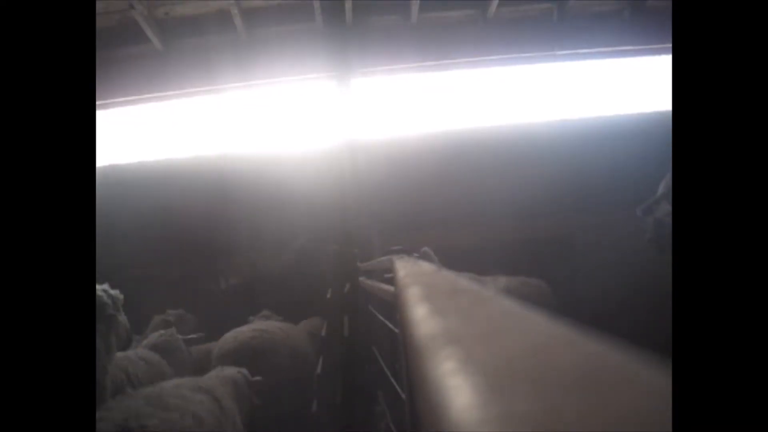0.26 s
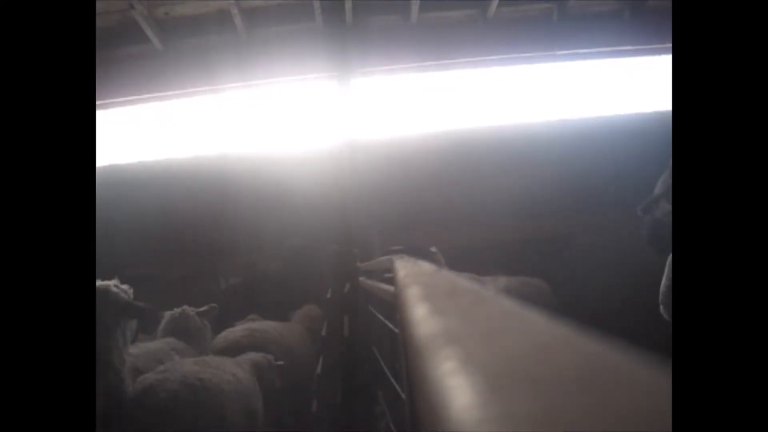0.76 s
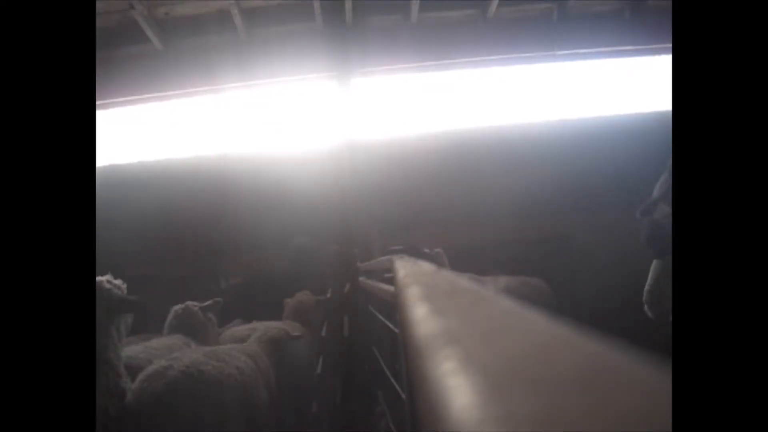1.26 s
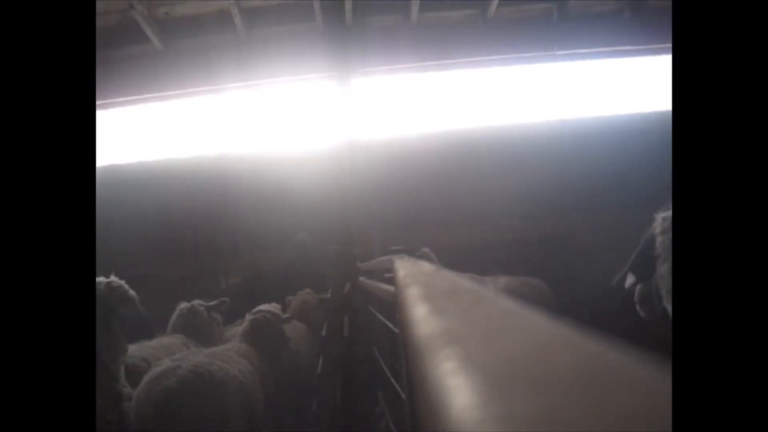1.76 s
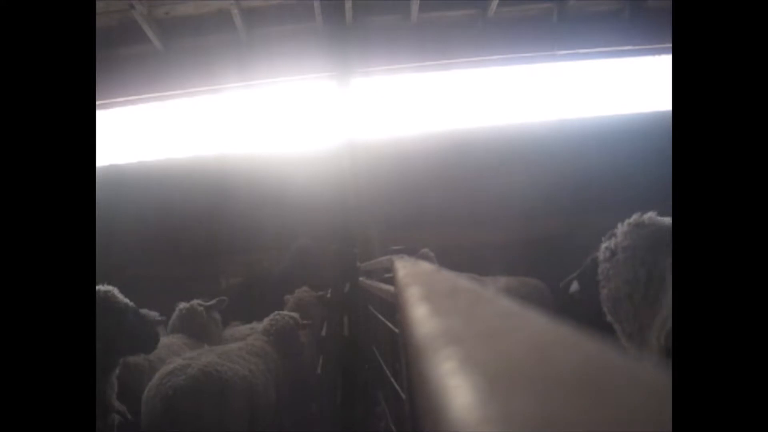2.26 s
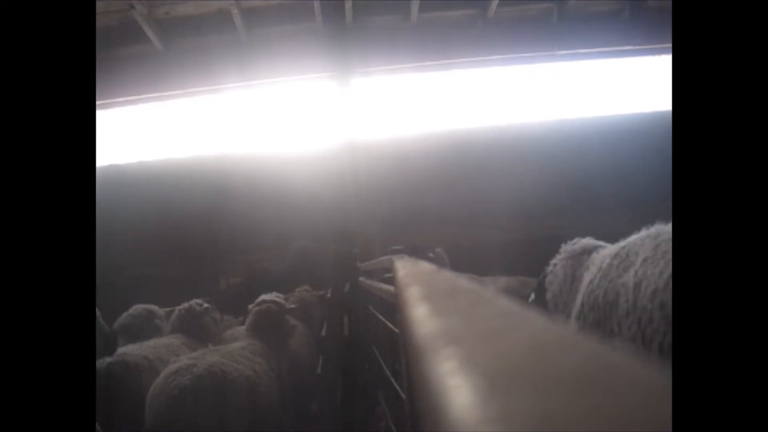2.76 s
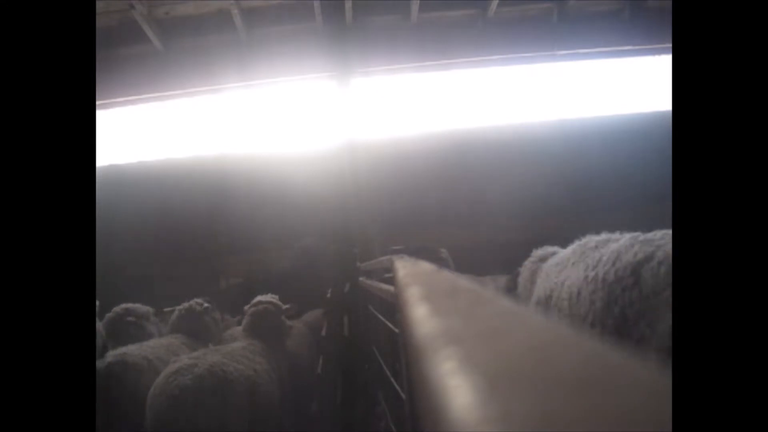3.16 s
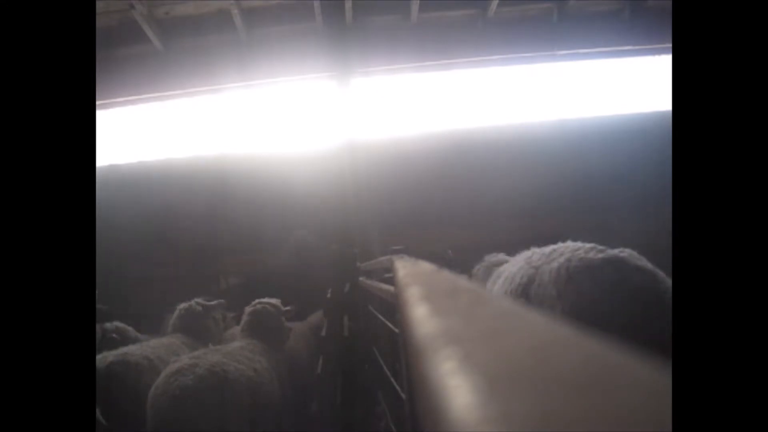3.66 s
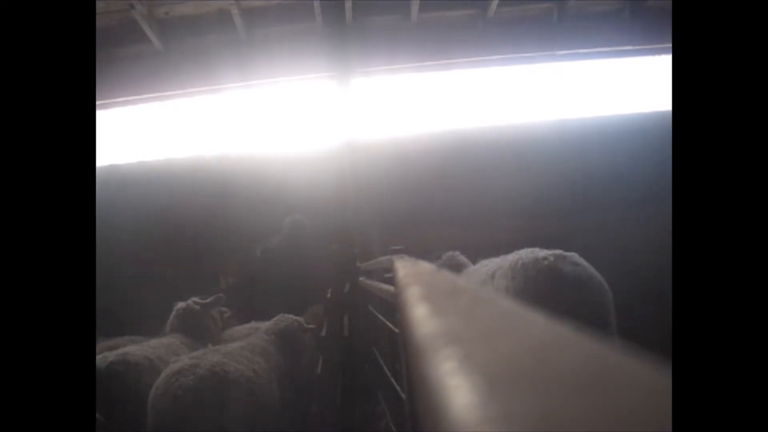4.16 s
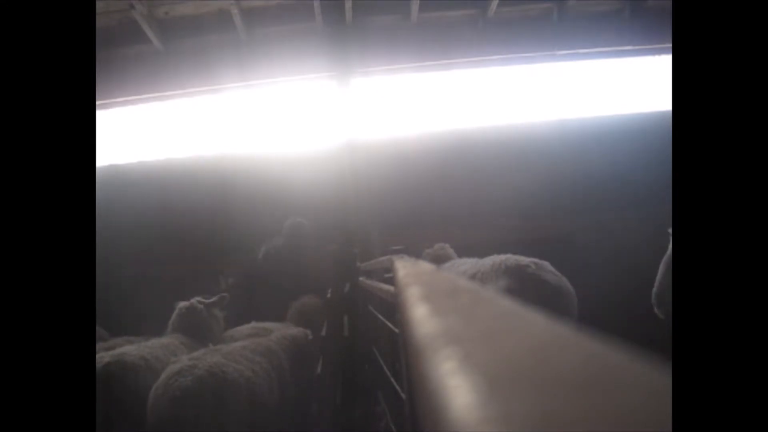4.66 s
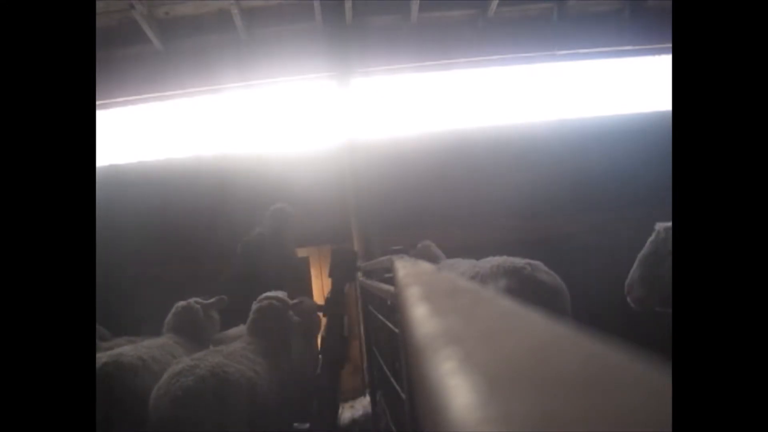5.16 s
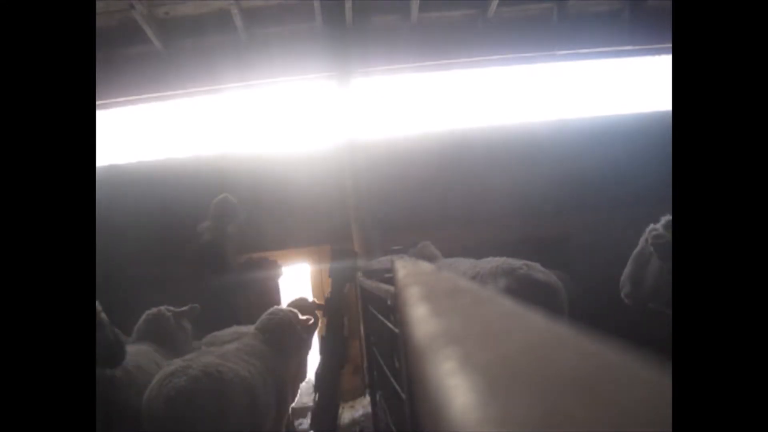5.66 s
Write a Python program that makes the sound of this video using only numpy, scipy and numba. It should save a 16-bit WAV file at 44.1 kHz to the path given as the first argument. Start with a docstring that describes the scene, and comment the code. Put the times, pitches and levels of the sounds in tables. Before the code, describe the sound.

A raspy bleat, then two sheep quavering together, among wooden bumps, rustling straw and chirping birds, before a door bolt rings.

```python
"""A sheep pen inside a barn, on one microphone. A lone ewe gives a bright, raspy bleat, then two bleat
together, duller and quavering: vocal fold pulses ring in throat and mouth. Straw rustles underfoot, thin
tones squeak and small birds chirp up in the rafters. The flock bumps and scuffs against wooden hurdles,
which creak; straw and fittings tick. Last, a steel bolt is shot back and rings as a door is opened."""
import sys
import numpy as np
from scipy import signal
from scipy.fft import rfft, irfft
from scipy.io import wavfile
from scipy.ndimage import uniform_filter1d, map_coordinates
from numba import njit

SR = 44100
rng = np.random.default_rng(int(sys.argv[2]) if len(sys.argv) > 2 else 0)


def wav_record(signal):
    """Record a signal, one row per channel, as 16-bit PCM in the file named by sys.argv[1]."""
    frames = np.transpose(np.atleast_2d(signal))
    bounded = np.clip(frames, -1, 1)
    # unit amplitude maps onto the largest positive 16-bit level
    quanta = np.round(bounded * 32767).astype(np.int16)
    wavfile.write(sys.argv[1], SR, quanta)


N = 260631
TIME = np.arange(N) / SR


def from_db(db):
    """Decibels to gain."""
    return 10 ** (np.asarray(db) / 20)


def unit_rms(x):
    """Scale to an rms of 1."""
    return x / np.sqrt(np.mean(x ** 2) + 1e-20)


def even(x):
    """Hold the running rms at 1."""
    return x / np.sqrt(np.abs(uniform_filter1d(x ** 2, size=2200)) + 1e-6 * np.mean(x ** 2))


def in_time(rows):
    """Each column of a (time, values...) table, interpolated to every sample."""
    times, *columns = np.transpose(rows)
    return [np.interp(TIME, times, column) for column in columns]


def band(x, hz, kind):
    """Butterworth filter, fourth order at each edge."""
    return signal.sosfilt(signal.butter(4, hz, kind, fs=SR, output="sos"), x + 1e-18)


def drift(rate_hz):
    """Smooth random wander with an rms of 1."""
    knots = rng.standard_normal(4096)
    return unit_rms(map_coordinates(knots, [TIME * rate_hz * 2], order=3, mode="wrap"))


def colour(x, spectrum, size=4096):
    """Causal (minimum-phase) filter with the outline (frequency [Hz], level [dB])."""
    hz, db = np.transpose(spectrum)
    outline = np.interp(np.log(np.fft.rfftfreq(size, 1 / SR) + 1), np.log(hz), db)
    cepstrum = irfft(np.log(from_db(outline)))
    cepstrum[1:size // 2] *= 2
    cepstrum[size // 2 + 1:] = 0
    return signal.fftconvolve(x, irfft(np.exp(rfft(cepstrum, size))))[:N]


def barn(x, wet_db, t60_s=.39, treble_t60_s=.3):
    """What reaches the microphone: direct sound plus dense reflections whose treble dies first."""
    t = TIME[:SR]
    echoes = rng.standard_normal(SR) * (t > .004)
    tail = band(echoes, 1970, "low") * from_db(-60 * t / t60_s)
    tail += band(echoes, 2510, "high") * from_db(-60 * t / treble_t60_s)
    reflections = signal.fftconvolve(x, tail / np.linalg.norm(tail))[:N]
    wet = from_db(wet_db)
    return (x + wet * reflections) / np.hypot(1, wet)


def grains(per_s, spread_db):
    """Random tiny contacts of uneven size."""
    sizes = from_db(spread_db * np.minimum(rng.exponential(1, N), 4)) * rng.choice([-1, 1], N)
    return unit_rms(sizes * (rng.random(N) < per_s / SR))


def pulse_train(pitch_hz, rough, jitter, rasp):
    """One pulse per cycle; roughness shakes timing and strength and adds noise in each cycle."""
    cycles = np.cumsum(pitch_hz * (1 + jitter * rough * (drift(70) + .5 * drift(16)))) / SR
    pulses = np.diff(np.floor(cycles), prepend=-1) * from_db(6.6 * rough * drift(80))
    turbulence = rng.standard_normal(N) * np.exp(-4 * (cycles % 1))
    return unit_rms(pulses) + rasp * rough * unit_rms(turbulence)


def glides(rows, waver, waver_hz, octave_db):
    """Short gliding tones of wavering pitch, each with its octave."""
    out = np.zeros(N)
    wobble = 1 + waver * drift(waver_hz)
    for start, length, start_hz, end_hz, level_db in rows:
        span = slice(int(start * SR), int((start + length) * SR))
        progress = np.linspace(0, 1, span.stop - span.start)
        hz = (start_hz + (end_hz - start_hz) * progress) * wobble[span]
        phase = 2 * np.pi * np.cumsum(hz) / SR
        envelope = np.sqrt(2) * from_db(level_db) * np.sin(np.pi * progress)
        out[span] += envelope * (np.sin(phase) + from_db(octave_db) * np.sin(2 * phase))
    return out


@njit
def moving_resonance(x, centre_hz, width_hz):
    """Two-pole resonator of peak gain 1 whose centre moves."""
    angle = 2 * np.pi * centre_hz / SR
    r = np.exp(-np.pi * width_hz / SR)
    y = np.zeros(len(x))
    for i in range(2, len(x)):
        drive = (1 - r * r) / 2 * (x[i] - x[i - 2])
        y[i] = drive + 2 * r * np.cos(angle[i]) * y[i - 1] - r * r * y[i - 2]
    return y


def bleat(folds, call, throat, mouth, wet_db, jaw_width_hz, tongue_width_hz=190):
    """Fold pulses ring in the throat; jaw and tongue each lift a moving resonance; the call shudders."""
    start, end, level_db, rasp_db, shudder_depth_db = call
    jaw_hz, jaw_db, tongue_hz, tongue_db = in_time(mouth)
    attack_s, accent_s, rasp_rise_s, release_s = .025, .06, .07, .05
    shudder_db = shudder_depth_db * drift(18)
    # the call opens with an accent; the rasp grows towards its end
    level_db = level_db + 2.5 * np.exp(-np.maximum(TIME - start, 0) / accent_s)
    rasp_db = rasp_db + 10 * np.exp(np.minimum(TIME - end, 0) / rasp_rise_s) + 1.7 * shudder_db
    gate = np.clip((TIME - start) / attack_s + .5, 0, 1) * np.clip((end - TIME) / release_s, 0, 1)
    voice = barn(band(colour(folds, throat), 128, "high"), wet_db)
    jaw = from_db(jaw_db) * even(moving_resonance(voice, jaw_hz, jaw_width_hz))
    tongue = from_db(tongue_db) * even(moving_resonance(voice, tongue_hz, tongue_width_hz))
    body = even(band(voice, 2750, "low"))
    vowel = even(from_db(shudder_db) * (body + tongue) + jaw)
    rasp = from_db(rasp_db) * even(band(voice, 3760, "high"))
    return barn(gate * from_db(level_db) * (vowel + rasp), wet_db=-8.5)


def lone_ewe():
    """One ewe's bright, raspy bleat, which grows hoarser as her pitch sinks."""
    # her bleat (start [s], end [s], level [dB], rasp [dB], shudder depth [dB])
    call = (-0.03, 0.527, -15.6, -13.5, .7)
    # vocal folds (time [s], pitch [Hz])
    pitch = [(0, 139.1), (.06, 142.7), (.12, 143.4), (.16, 138.8), (.24, 138.6), (.38, 133.6), (.43, 127.7),
             (.52, 121)]
    # hoarseness over her range (pitch [Hz], roughness [0-1])
    hoarseness = [(121, .2), (138, .12), (141, .05)]
    # throat resonances (frequency [Hz], level [dB])
    throat = [(140, -15), (280, -21), (420, -9.5), (560, -7), (675, -1.5), (830, -17), (1120, -6.5),
              (1400, -7), (1720, -13), (2150, 0), (2700, -9), (3000, -14), (3650, -19), (4150, -15),
              (4500, -17), (4950, -13), (5350, -35), (7000, -35), (8700, -44), (10300, -42), (13000, -72)]
    # mouth resonances (time [s], jaw [Hz], jaw lift [dB], tongue [Hz], tongue lift [dB])
    mouth = [(0, 570, -6, 2080, -2), (.09, 575, -4, 2120, -3), (.125, 690, -4, 2130, -4),
             (.21, 690, -8, 2230, -6), (.29, 675, 0, 2230, -4), (.36, 668, 3, 2400, -7),
             (.42, 645, 3, 2600, -8), (.5, 615, 2, 2690, -6)]
    pitch_hz = in_time(pitch)[0]
    rough = np.interp(pitch_hz, *np.transpose(hoarseness))
    folds = pulse_train(pitch_hz, rough, jitter=.03, rasp=.6)
    return bleat(folds, call, throat, mouth, wet_db=3.5, jaw_width_hz=40)


def straw():
    """Trodden straw: fine crackle that swells and sinks over the barn's hush."""
    # colour of straw and hush (frequency [Hz], level [dB])
    spectrum = [(15, -42), (25, -9.5), (148, 1), (331, -1), (389, 1), (582, -1), (648, -1), (895, -1.5),
                (1170, -3), (1270, -3), (1850, -6.5), (2630, -4.5), (6380, -11.5), (15500, -28)]
    # restless feet (time [s], level [dB])
    shuffle = [(0, -37), (.7, -41), (2.7, -45), (3.3, -35.5), (3.85, -41.5), (4.25, -37.5), (4.5, -42.5),
               (4.98, -37), (5.7, -43), (5.9, -38)]
    crackle = .6 * grains(4000, spread_db=2.5) * from_db(2.5 * drift(14))
    hush = rng.standard_normal(N)
    rustle = band(colour(hush + crackle, spectrum), 15000, "low")
    return from_db(in_time(shuffle)[0]) * unit_rms(rustle)


def thin_tones():
    """Short thin tones with their octave: a whistle in the bleat, squeaks, a chirp's low undertone."""
    # tones (time [s], length [s], start pitch [Hz], end pitch [Hz], level [dB])
    tones = [(0.458, 0.047, 2860, 2650, -23), (.592, 0.019, 790, 800, -25), (1.284, 0.018, 605, 552, -19.5),
             (3.194, 0.046, 950, 1064, -24), (3.227, 0.092, 1038, 1112, -24.5),
             (3.438, 0.035, 1760, 1710, -35)]
    return from_db(3) * barn(glides(tones, waver=.01, waver_hz=93, octave_db=-9), wet_db=-3)


def woodwork(rise_s=.016):
    """Each bump is a swelling, then dying burst of contacts in the boards; the thud outlasts the top."""
    # knocks on the boards (time [s], level [dB], crack [dB], t60 [s])
    knocks = [(.538, -10, -9, .14), (.969, -4, -27, .075), (1.056, -14, -11, .2), (1.095, -3.5, -8.5, .16),
              (1.319, -11, -6, .24), (1.826, -20, -4, .2), (1.838, -13, -4, .26), (1.872, -9.5, -2, .3),
              (2.105, -10, -5, .28), (3.177, -3.5, -10, .18), (3.295, -3.5, -25, .15),
              (3.637, -12, -25, .075)]
    # a body shoves the hurdle and the floor thuds (time [s], level [dB], thud [dB], crack [dB])
    shoves = [(3.271, -4, -5, -9), (3.352, -13.5, -2, -9), (4.607, -11, -6, -1), (4.635, -8.5, -17, -1)]
    # hooves and the door scuff over the floor (time [s], level [dB], crack [dB])
    scuffs = [(1.949, -21, -5), (1.995, -22, -4), (2.042, -18.5, -5), (3.15, -25, 4), (3.225, -23, 5),
              (4.322, -26, 4), (4.861, -26, -1), (4.921, -22, -.5), (4.965, -27, -1), (5.09, -26.5, 2),
              (5.214, -29, 10), (5.254, -24.5, 8), (5.296, -19, -4), (5.762, -20, -6), (5.834, -24, -6)]
    # colour of the boards (frequency [Hz], level [dB])
    spectrum = [(24, -40), (40, -30), (103, -42), (233, -5.5), (502, -0.5), (627, 2.5), (1290, -10),
                (1420, -8.5), (1690, -14), (2110, -7), (3300, -9.5), (3560, -10.5), (6300, -32.5),
                (9360, -33.5), (15000, -49)]
    bumps = [(s, db, -32, crack, crack - 22, t60) for s, db, crack, t60 in knocks]
    bumps += [(s, db, thud, crack, crack - 11, .17) for s, db, thud, crack in shoves]
    bumps += [(s, db, -21, crack, -10, .24) for s, db, crack in scuffs]
    times, level_db, thud_db, crack_db, splinter_db, t60_s = np.transpose(bumps)
    boards = colour(grains(7000, spread_db=3), spectrum)
    # thud, body, crack and splinters (band [Hz], level [dB], stretch of rise and decay [ratio])
    parts = [((45, 135), thud_db - 6.5, 2), ((165, 1450), -1.5, 1),
             ((1450, 6000), crack_db, 1), ((6000, 13000), splinter_db - 3, 1)]
    out = np.zeros(N)
    for edges_hz, part_db, stretch in parts:
        power = np.zeros(N)
        for at, gain, ring_s in zip((times * SR).astype(int), from_db(level_db + part_db), t60_s):
            t = TIME[:min(SR, N - at)] / stretch
            envelope = gain * np.minimum(t / rise_s, 1) * from_db(-60 * t / ring_s)
            power[at:at + len(t)] += envelope ** 2
        out += np.sqrt(power) * unit_rms(band(boards, edges_hz, "band"))
    return from_db(-2.3) * barn(out, wet_db=-4.5)


def birds(buzz_depth=.12, buzz_hz=450):
    """From the rafters, mostly through the room: bending whistles, some fluttered into a harsh buzz."""
    # notes (time [s], length [s], start [Hz], middle [Hz], end [Hz], level [dB], buzz [0-1])
    chirps = [(.712, .05, 3200, 4450, 2900, -25, .3), (.768, .052, 3000, 4050, 2600, -22, .4),
              (.795, .085, 5600, 5700, 4400, -33, .3), (1.02, .05, 4700, 4200, 3300, -35, .5),
              (1.232, .06, 4200, 3400, 2700, -30, .4), (1.285, .05, 4300, 4900, 4400, -35, .4),
              (1.42, .055, 4300, 3200, 2750, -28, .5), (1.615, .055, 4200, 3400, 2600, -32, .7),
              (1.665, .045, 4700, 4950, 4300, -27, .3), (1.67, .04, 3200, 3400, 2600, -29, .5),
              (1.738, .045, 2950, 3650, 4200, -22, .25), (2.035, .055, 5600, 4700, 3900, -26, .5),
              (2.09, .05, 4300, 4000, 3300, -30, .5), (2.39, .04, 4200, 4100, 3700, -36, .2),
              (2.45, .05, 3500, 3350, 2700, -31, .2), (2.8, .06, 4300, 4200, 3600, -38, .6),
              (3.15, .05, 4000, 5200, 3800, -31, 1), (3.197, .052, 4600, 4150, 3600, -22, .35),
              (3.25, .05, 4500, 3700, 3000, -24, .5), (3.425, .065, 4700, 3500, 2800, -28, .9),
              (3.5, .055, 4450, 4300, 2900, -31, .2), (3.575, .035, 2350, 2750, 3000, -31, .3),
              (3.635, .055, 4400, 4250, 2800, -29.5, .4), (3.705, .035, 2400, 2850, 3050, -31, .3),
              (3.985, .06, 4300, 3000, 2400, -35, 1), (4.02, .055, 3300, 4300, 3000, -25, 1),
              (4.072, .06, 4000, 3350, 2750, -24, .5), (4.272, .055, 4400, 3600, 2600, -35, .8),
              (5.152, .028, 5200, 4600, 3700, -21.5, .2)]
    out = np.zeros(N)
    flutter = buzz_depth * drift(buzz_hz)
    for start, length, start_hz, middle_hz, end_hz, level_db, buzz in chirps:
        span = slice(int(start * SR), int((start + length) * SR))
        progress = np.linspace(0, 1, span.stop - span.start)
        hz = np.polyval(np.polyfit([0, .5, 1], [start_hz, middle_hz, end_hz], 2), progress)
        phase = 2 * np.pi * np.cumsum(hz * (1 + buzz * flutter[span])) / SR
        envelope = from_db(level_db) * np.abs(np.sin(np.pi * progress)) ** .55
        out[span] += envelope * (np.sin(phase) + from_db(-29.5) * np.sin(2 * phase))
    return from_db(7.7) * barn(band(out, 1800, "high"), wet_db=2.5)


def creak(attack_s=.02, decay_s=.015):
    """Wood sticks and slips a few hundred times a second and sets the hurdle ringing."""
    # pushes on the hurdle (time [s], length [s], slip rate [Hz], level [dB])
    pushes = [(.957, .02, 228, -25), (1.037, .075, 243, -26), (1.308, .035, 232, -16),
              (1.345, .04, 242, -15.5), (1.4, .07, 243, -25)]
    # ring of the hurdle (frequency [Hz], level [dB])
    spectrum = [(150, -27), (245, 1), (480, 6.5), (700, 4), (960, 2), (1180, -7), (1450, 1), (1950, -16),
                (2200, -12), (2420, 1), (2700, -12), (3400, 2), (3850, 0), (4500, -10), (7000, -45),
                (14000, -62)]
    envelopes = []
    for start, length, _, db in pushes:
        rise = np.clip((TIME - start) / attack_s, 0, 1)
        fall = np.exp(-np.maximum(TIME - start - length, 0) / decay_s)
        envelopes.append(from_db(db) * rise * fall)
    slip_hz = np.array(pushes)[np.argmax(envelopes, axis=0), 2]   # the strongest push sets the rate
    slips = pulse_train(slip_hz, rough=.2, jitter=.04, rasp=1.1)
    return barn(np.max(envelopes, axis=0) * unit_rms(colour(slips, spectrum)), wet_db=-4.5)


def ewe_pair():
    """A ewe hums, then opens into a duller, quavering bleat; a companion joins in."""
    # their bleat (start [s], end [s], level [dB], rasp [dB], shudder depth [dB])
    call = (2.152, 3.178, -15.2, -26.5, 1.5)
    # the leader's vocal folds, rising and falling in one arch (time [s], pitch [Hz])
    pitch = [(2.2, 161.5), (2.26, 170.2), (2.31, 198), (2.4, 209), (2.54, 207), (2.61, 217), (2.68, 222.2),
             (2.8, 218.3), (2.89, 200), (2.96, 199), (3.04, 174.5), (3.11, 164), (3.18, 160)]
    # hoarseness over her range (pitch [Hz], roughness [0-1])
    hoarseness = [(165, .36), (205, .52), (214, .48), (220, .16)]
    # the companion's voice (time [s], pitch [Hz], level against the leader [dB])
    companion_line = [(2.25, 173.4, -15), (2.32, 190, -2), (2.44, 192, -2), (2.55, 190, -10),
                      (2.76, 187, -9), (2.87, 189.5, 3), (3.0, 187, -6), (3.1, 181.6, -3)]
    # throat resonances of the pair (frequency [Hz], level [dB])
    throat = [(190, -10), (300, -12), (430, -3), (620, 3), (740, -1), (900, -4.5), (1150, -7), (1560, -2),
              (1850, -8), (2250, 1), (2700, -5), (3400, -19), (4700, -22), (5400, -13), (6100, -32),
              (8000, -32), (10000, -40), (13000, -64)]
    # mouth resonances (time [s], jaw [Hz], jaw lift [dB], tongue [Hz], tongue lift [dB])
    mouth = [(2.16, 650, -3, 2150, -7), (2.21, 665, -3, 2250, -4), (2.26, 685, 1, 1580, -10),
             (2.32, 760, -4, 1530, -7), (2.41, 750, -7, 1560, 0), (2.52, 665, -7, 1580, -6),
             (2.62, 670, -3, 1520, -7), (2.665, 880, -2, 1480, -10), (2.73, 745, -3, 1510, -16),
             (2.8, 690, -8, 1510, -12), (2.88, 755, -2, 1560, -9), (2.96, 785, 0, 1570, -8),
             (3.03, 705, 3, 1550, -4), (3.08, 720, 3, 1530, -6), (3.15, 665, 3, 1520, -10)]
    # her start, mouth shut (time [s], length [s], start pitch [Hz], end pitch [Hz], level [dB])
    hum_glide = [(2.098, 0.035, 148, 214, -23.5)]
    leader_hz = in_time(pitch)[0]
    companion_hz, companion_db = in_time(companion_line)
    rough = np.interp(leader_hz, *np.transpose(hoarseness))
    quaver = 1 + .055 * rough * np.sin(2 * np.pi * 13 * TIME + drift(3))
    leader = pulse_train(leader_hz * quaver, rough, jitter=.05, rasp=.55)
    companion = from_db(companion_db) * pulse_train(companion_hz, rough, jitter=.036, rasp=1.0)
    duet = bleat(leader + companion, call, throat, mouth, wet_db=1.5, jaw_width_hz=75)
    hum = glides(hum_glide, waver=.013, waver_hz=100, octave_db=-13)
    return duet + barn(hum, wet_db=-6)


def ticks(rise_s=.0015, decay_s=.0048):
    """Straw and fittings: short snaps that build up for an instant before they give."""
    # snaps (time [s], level [dB])
    snaps = [(3.282, -14), (3.3094, -7.5), (3.319, -12), (3.5914, -19), (3.6954, -17.5), (3.725, -19.5),
             (4.3428, -17), (4.586, -12.5), (4.64, -9.5), (4.672, -9), (4.868, -24), (5.1794, -4),
             (5.3062, -7), (5.3488, -12.5)]
    # colour of a snap (frequency [Hz], level [dB])
    spectrum = [(300, -5), (1500, 3.5), (4000, 6), (8000, -4.5), (15000, -25)]
    envelope = sum(from_db(db) * np.exp(-np.maximum((s - TIME) / rise_s, (TIME - s) / decay_s))
                   for s, db in snaps)
    noise = unit_rms(colour(rng.standard_normal(N), spectrum))
    return from_db(-5) * barn(envelope * noise, wet_db=-7.5)


def bolt(crack_s=.00096, jolt_at_s=5.3, damping_s=.027):
    """Each crack against the stop starts the bolt ringing afresh, until the door's next jolt damps it."""
    # the bolt hits its stop and bounces (time [s], level [dB])
    hits = [(5.178, -6), (5.1812, -1), (5.1838, 3)]
    # modes of the steel (frequency [Hz], level [dB], t60 [s])
    modes = [(1485, -22, .13), (1529, -28, .6), (2242, -26, .185), (2600, -3, .01), (2687, -17, .08),
             (2798, -18, .09), (4250, -23, .1), (4748, -28, 1.5), (6595, -32, 1.3), (7170, -35.5, 3),
             (9595, -40, .35), (10926, -41, .35)]
    out = np.zeros(N)
    for start, hit_db in hits:
        at = int(start * SR)
        t = TIME[:N - at]
        noise = band(rng.standard_normal(len(t)), (500, 8500), "band")
        crack = from_db(-8) * noise * np.exp(-t / crack_s)
        ring = sum(from_db(db - 60 * t / t60) * np.sin(2 * np.pi * hz * t + rng.uniform(0, 2 * np.pi))
                   for hz, db, t60 in modes)
        out[at:] = from_db(hit_db) * (crack + ring)
    damping = np.exp(-np.maximum(TIME - jolt_at_s, 0) / damping_s)
    return barn(out * damping, wet_db=-20)


def scene():
    """Everything in the barn, at one microphone."""
    ewes = lone_ewe() + ewe_pair()
    return (ewes + straw() + thin_tones() + woodwork() + birds() + creak() + ticks() + bolt())[None]


def record(dry, ceiling=1.5, cutoff_hz=15750):
    """Behind the microphone, peaks are gently rounded and the top is cut steeply."""
    rounded = ceiling * np.tanh(dry / ceiling)
    return signal.sosfilt(signal.ellip(12, .1, 90, cutoff_hz, fs=SR, output="sos"), rounded)


dry = scene()
out = record(dry)
wav_record(out)
```